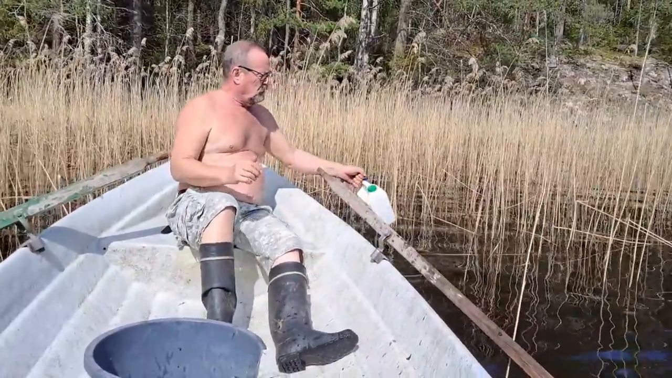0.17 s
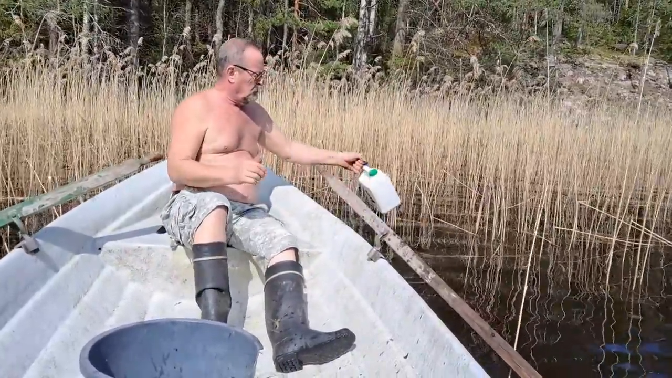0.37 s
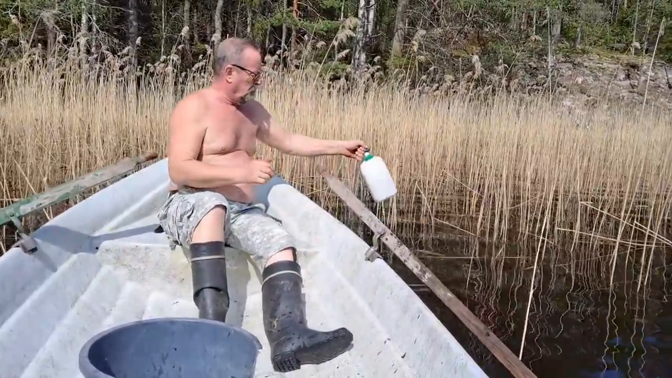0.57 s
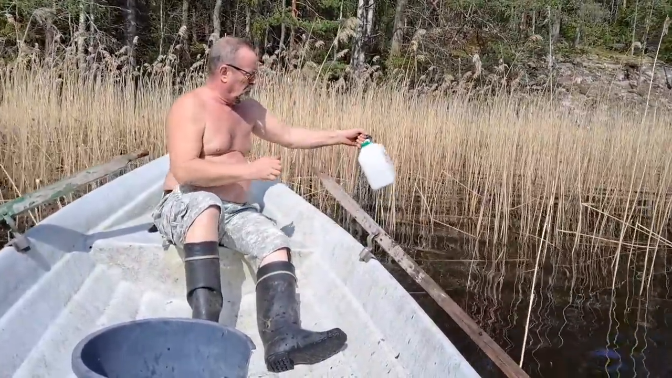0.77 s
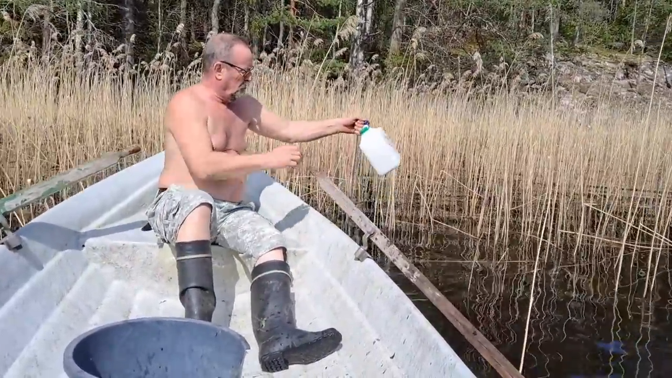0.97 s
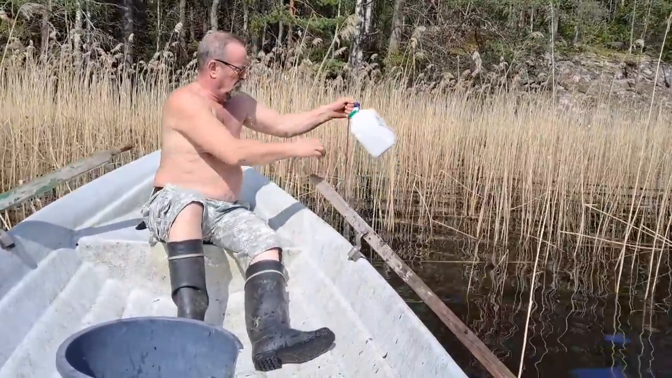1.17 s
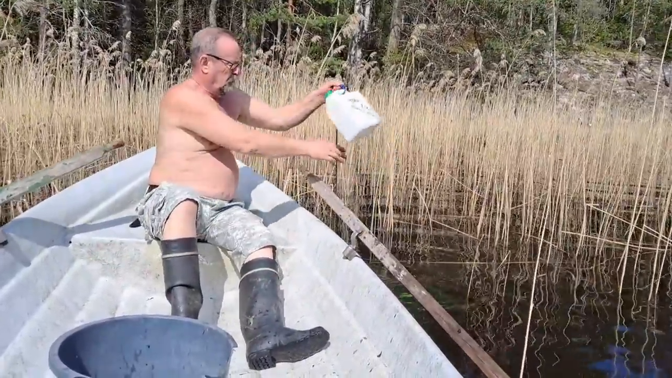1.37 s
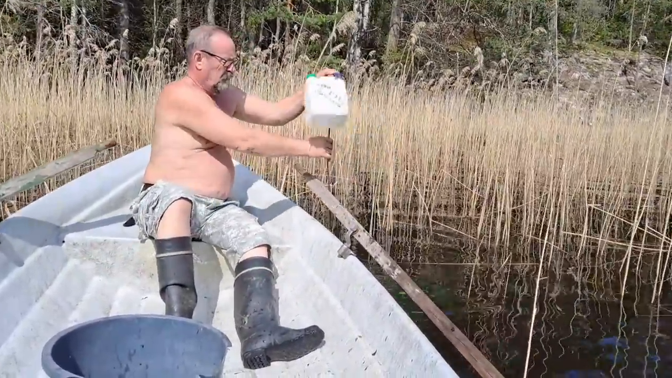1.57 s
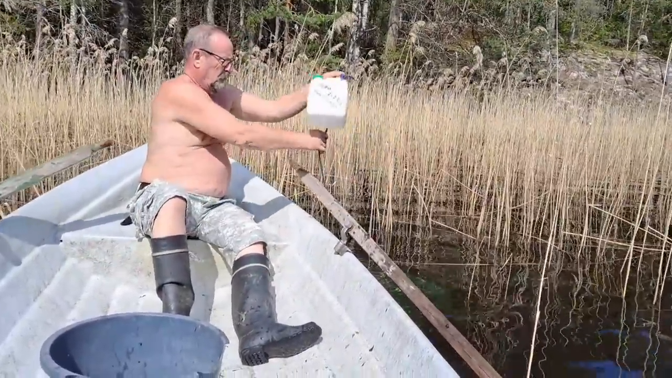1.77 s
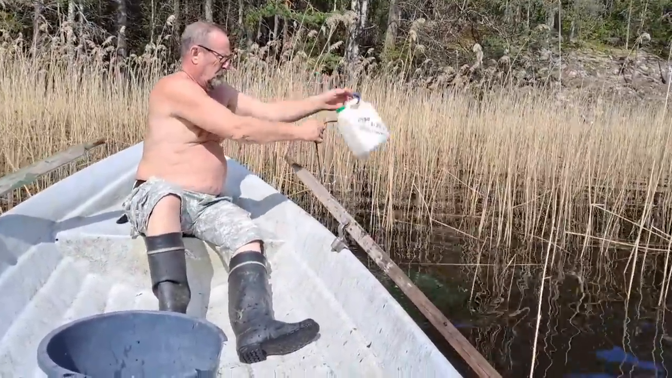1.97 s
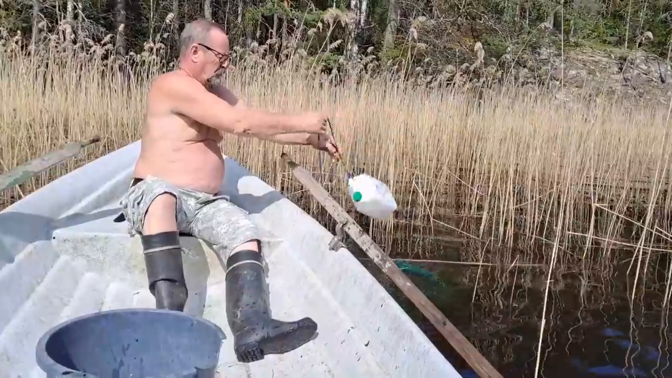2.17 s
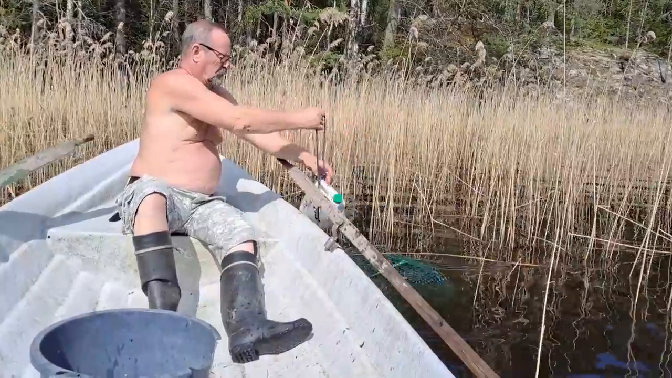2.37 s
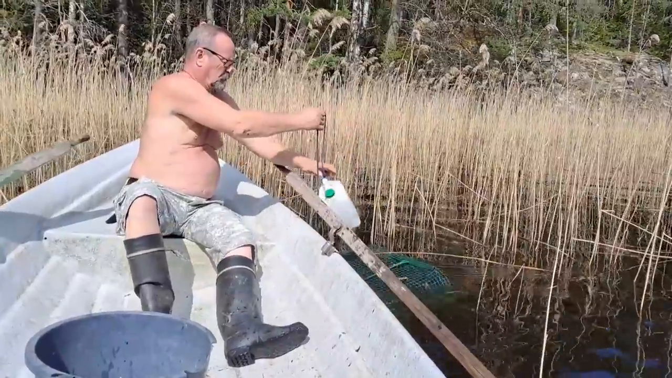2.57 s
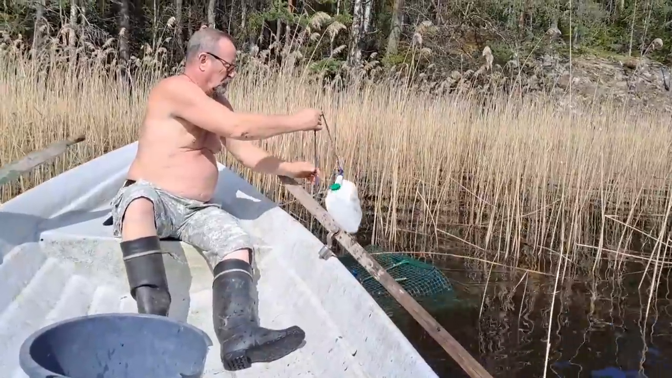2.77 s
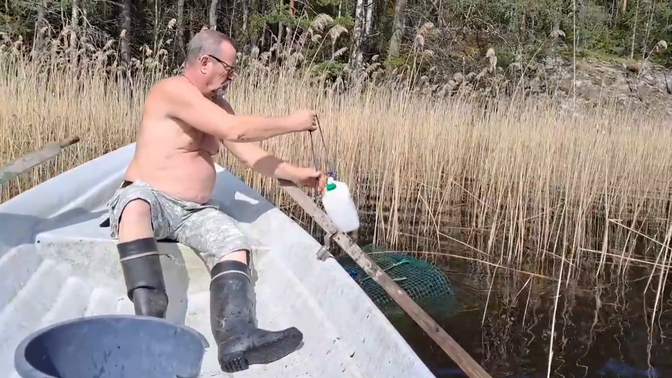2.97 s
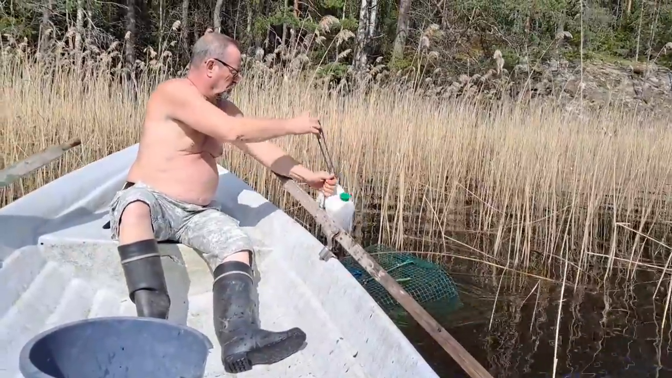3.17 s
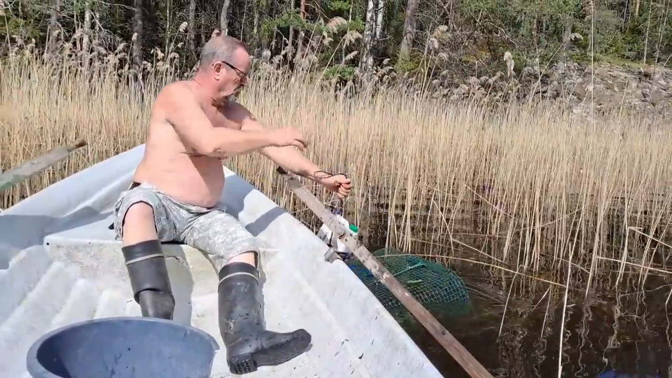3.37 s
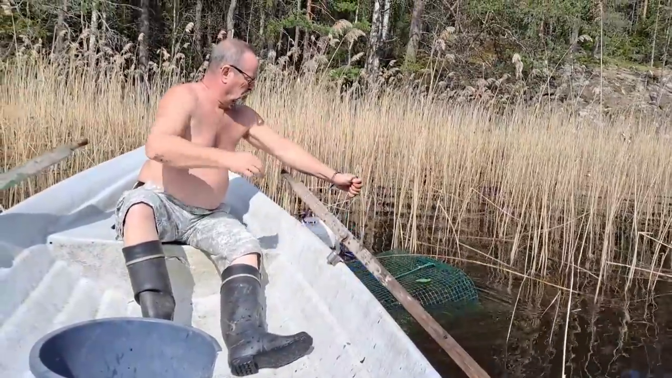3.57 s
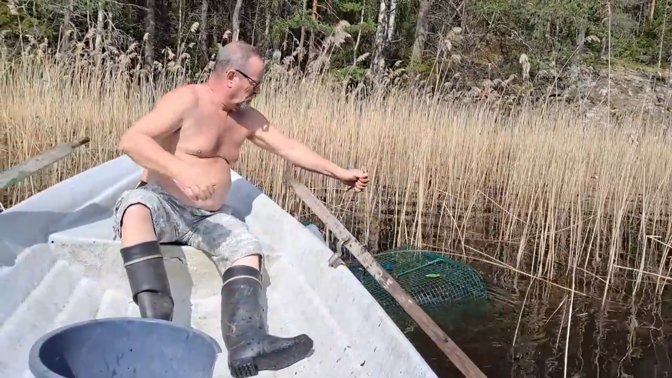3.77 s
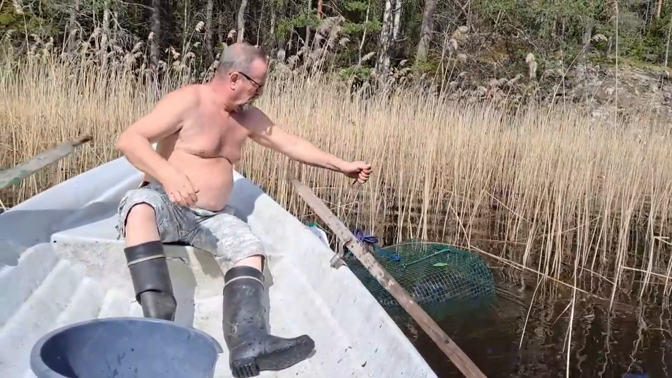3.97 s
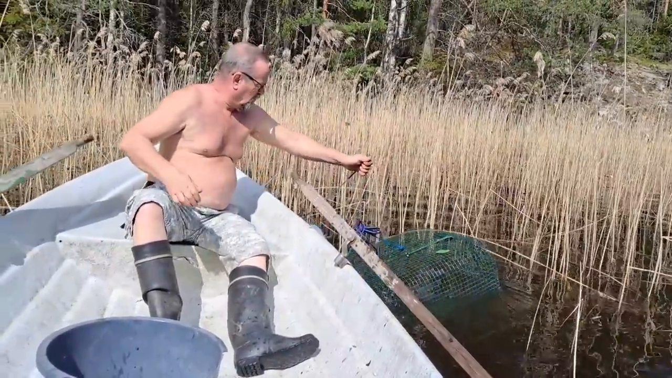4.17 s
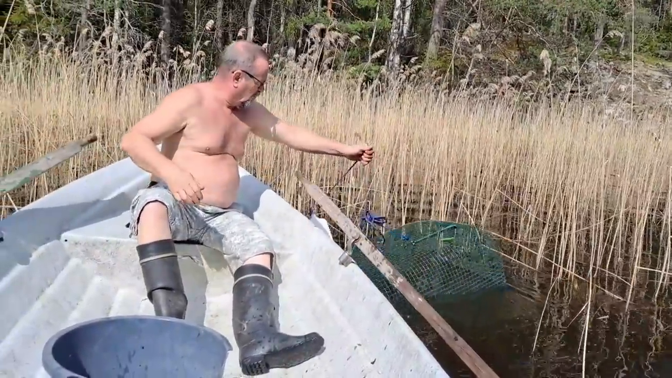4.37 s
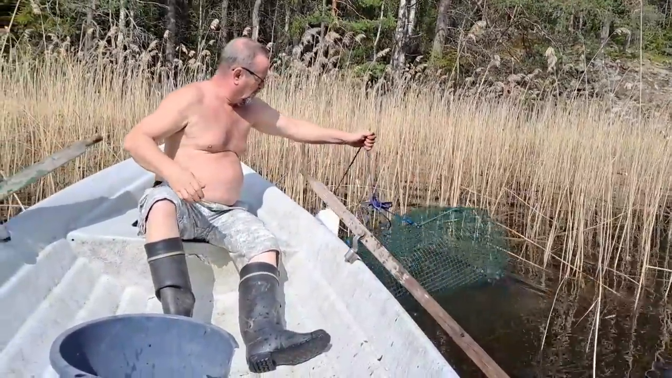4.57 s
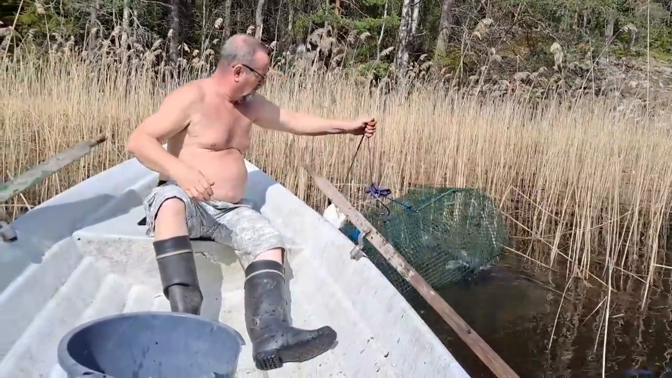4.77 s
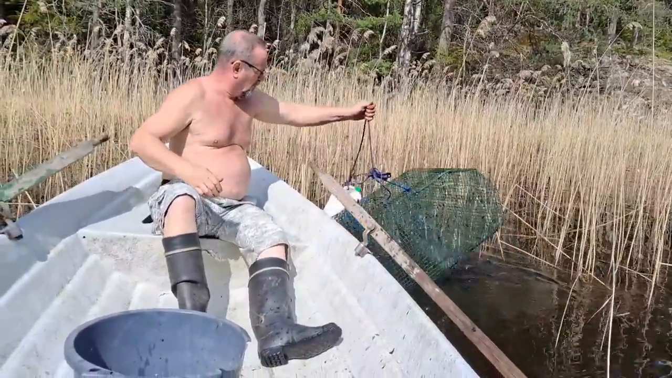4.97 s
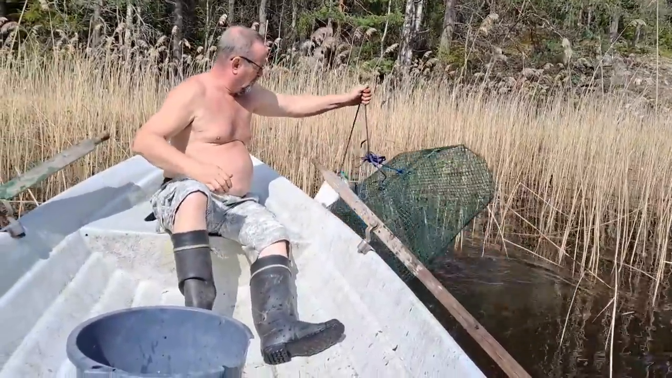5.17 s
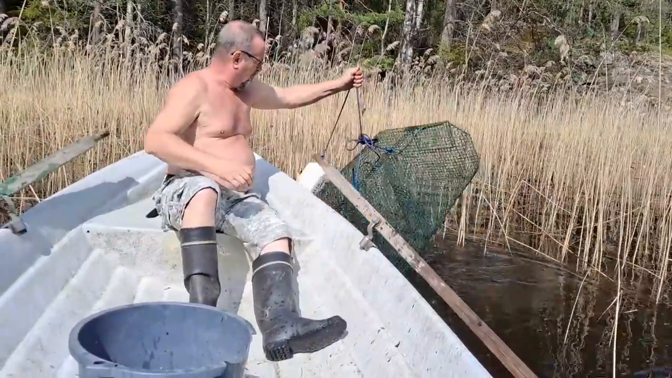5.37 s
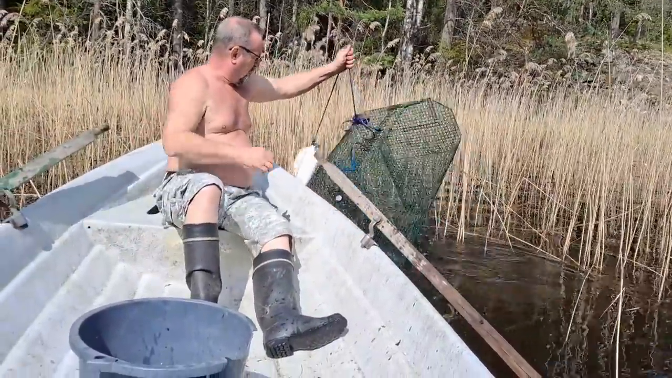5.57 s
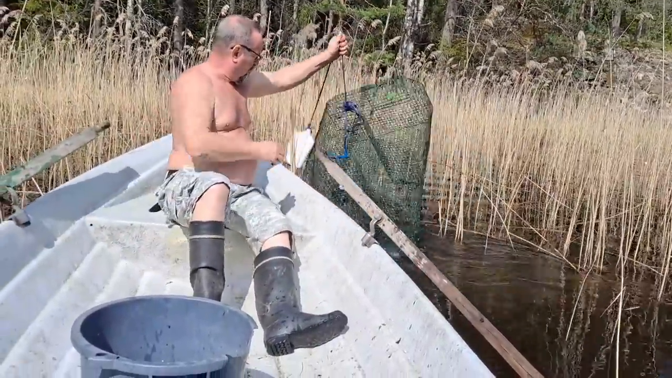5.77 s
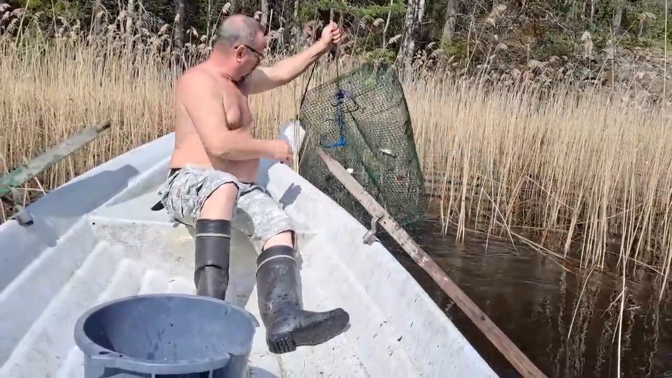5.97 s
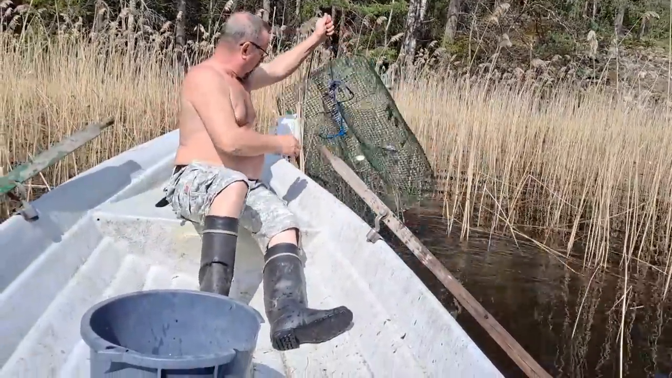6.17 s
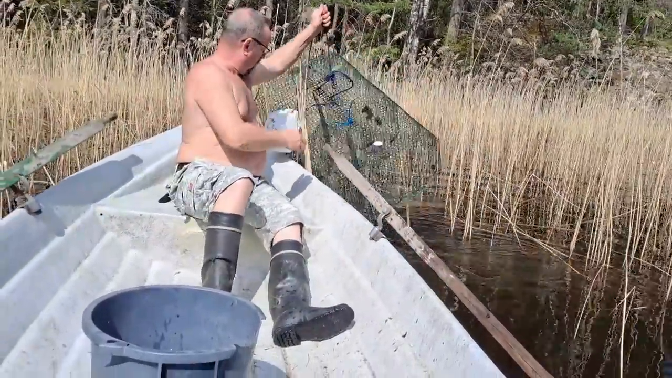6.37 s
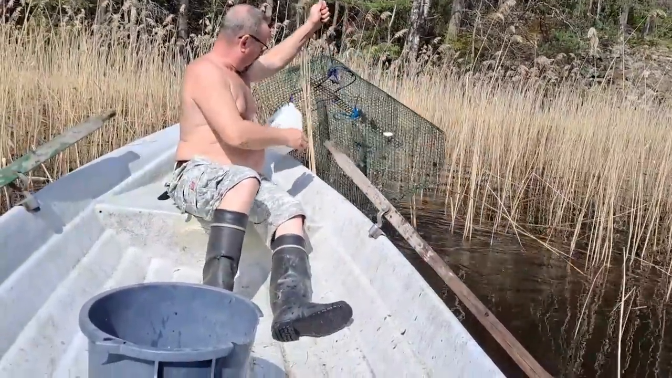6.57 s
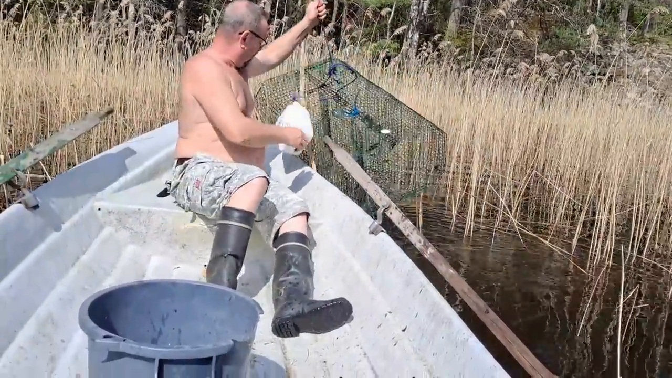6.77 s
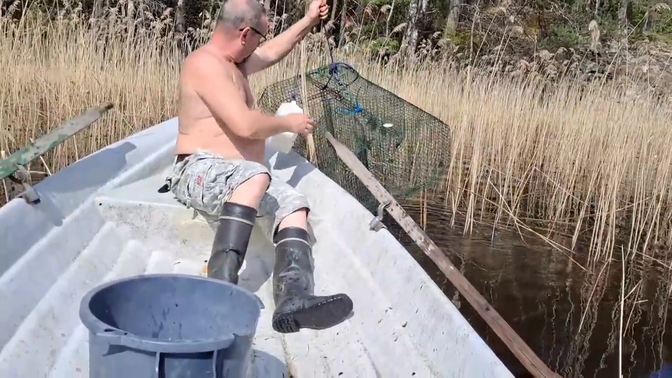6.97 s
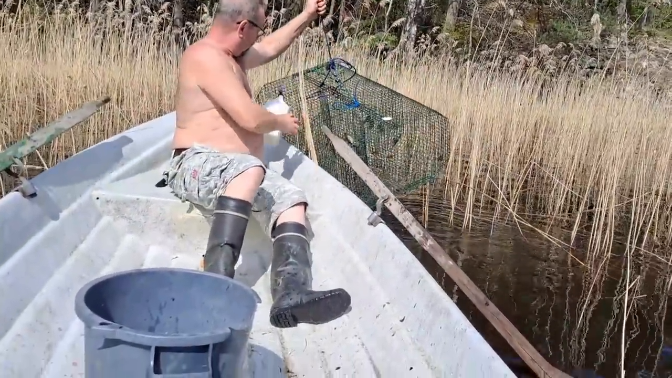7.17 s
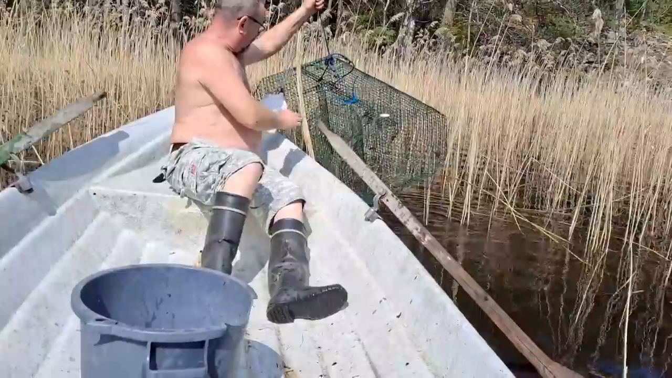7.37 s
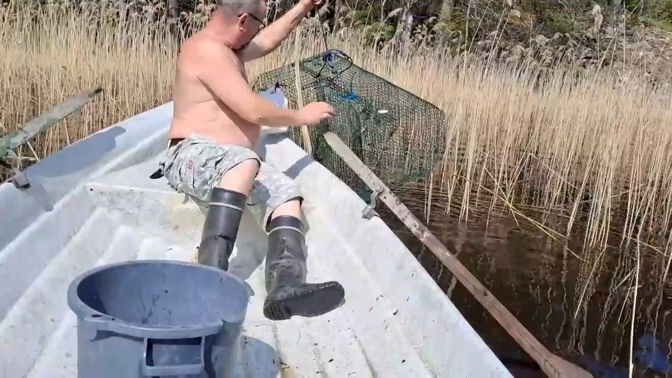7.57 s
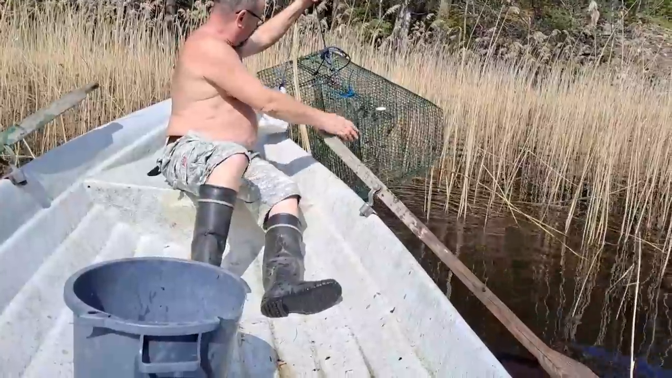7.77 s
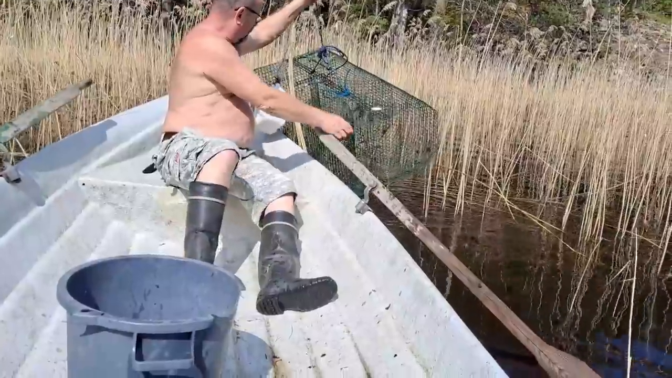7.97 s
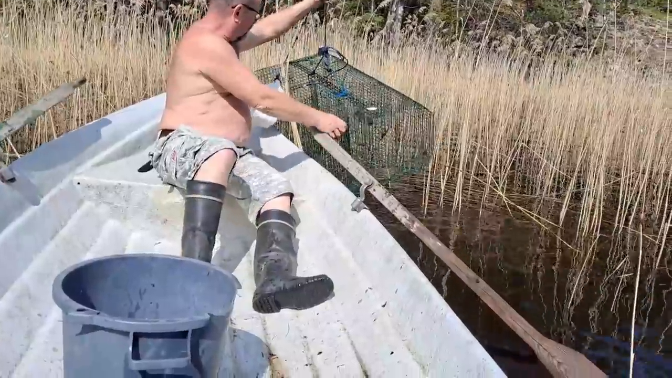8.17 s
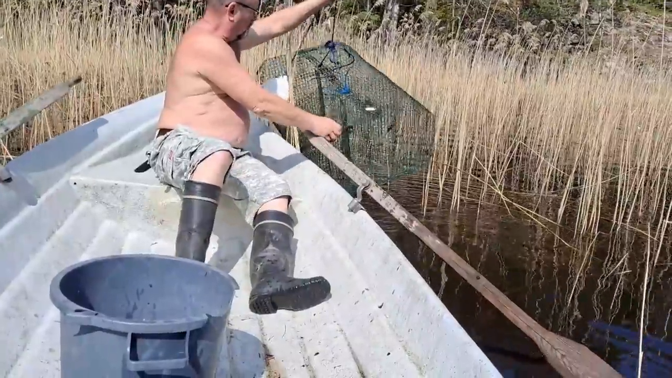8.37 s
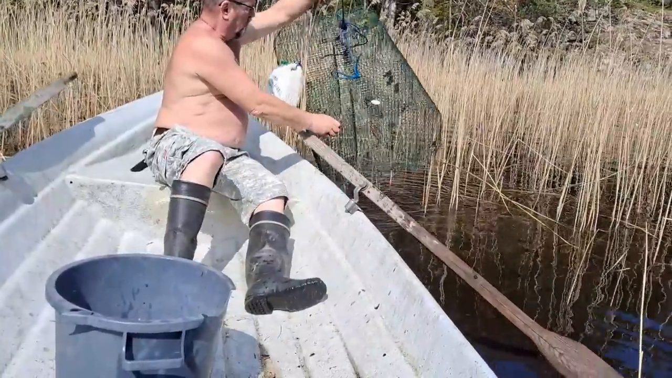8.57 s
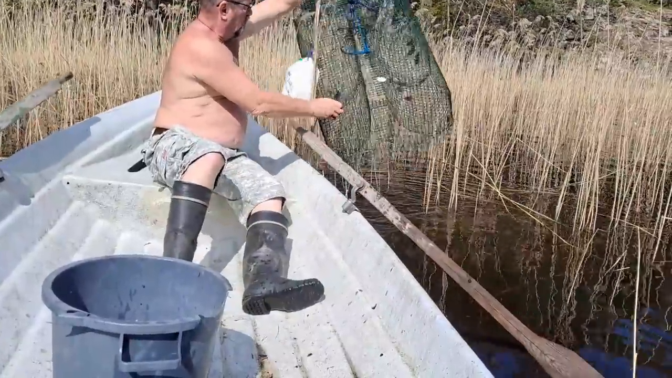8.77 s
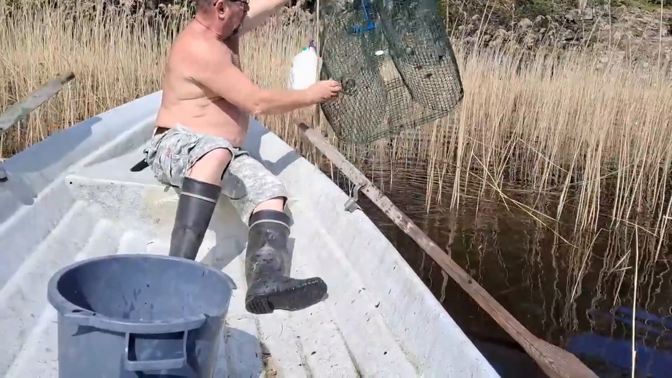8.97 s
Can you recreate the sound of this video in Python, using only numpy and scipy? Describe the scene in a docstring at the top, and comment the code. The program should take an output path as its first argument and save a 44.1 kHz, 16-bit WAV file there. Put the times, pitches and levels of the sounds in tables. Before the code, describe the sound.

A plastic float knocks sharply against a rowboat's thin hull, then rope and a wire fish trap rub along the side with a hollow groan. Water plops and trickles off the rising mesh amid a busier run of knocks, scrapes and wire ticks. The handling eases, and the wire gives one short squeak. A small bird sings faintly among distant trees, while the boat sounds are close in a quiet outdoor stereo space.

```python
"""Hauling a fish trap into a rowboat

A wire trap comes out of a reedy lake. Its plastic float and frame knock and drag on the thin hull,
exciting the wall's modes by impact and by stick-slip friction. The mesh ticks and squeaks on the oar,
and water runs off in noise and ringing bubbles. A small bird sings far away among echoing trees.
Two microphone ports a little apart hear it all, with a faint rumble of air."""
import sys
import numpy as np
from scipy import signal
from scipy.fft import rfft, irfft, next_fast_len
from scipy.io import wavfile
from scipy.ndimage import uniform_filter1d, map_coordinates

SR = 44100
rng = np.random.default_rng(int(sys.argv[2]) if len(sys.argv) > 2 else 0)


def unload_audio(sound):
    """Save the sound as a 16-bit wav file, at the path given as the first command line argument."""
    columns = np.transpose(np.atleast_2d(sound))
    # keep every value between -1 and 1, then stretch to whole-number steps
    steps = np.round(np.clip(columns, -1, 1) * 32767)
    wavfile.write(sys.argv[1], SR, steps.astype(np.int16))


N = 398223


def amp(db):
    """Amplitude ratio of a level in decibels."""
    return 10 ** (np.asarray(db) / 20)


def unit(x):
    """Normalisation to an rms of 1."""
    return x / np.sqrt(np.mean(x ** 2) + 1e-20)


def along(points, hz):
    """Interpolation of (frequency, value) points on a logarithmic frequency axis."""
    point_hz, values = np.transpose(points)
    return np.interp(np.log(hz + 1), np.log(point_hz + 1), values)


def curves(rows):
    """Linear interpolation in time: one curve for each column after the first."""
    times, *columns = np.transpose(rows)
    return [np.interp(np.arange(N) / SR, times, column) for column in columns]


def wobble(rate_hz):
    """Random modulation: a smooth curve of rms 1 through rate_hz random values a second."""
    knots = rng.standard_normal(int(N * rate_hz / SR) + 4)
    return unit(map_coordinates(knots, [np.arange(N) * rate_hz / SR]))


def filtered(x, response):
    """Linear filtering: the spectrum is multiplied by a complex frequency response."""
    size = next_fast_len(N + SR // 2)
    return irfft(rfft(x, size) * response(np.fft.rfftfreq(size, 1 / SR)), size)[..., :N]


def colour(spectrum):
    """Magnitude response through (frequency_hz, level_db) points."""
    return lambda hz: amp(along(spectrum, hz))


def add(track, start_s, sound, pan_db):
    """Superposition of a sound on the track, pan_db stronger on the left than on the right."""
    spot = track[:, round(start_s * SR):round(start_s * SR) + sound.shape[-1]]
    spot += amp([[pan_db / 2], [-pan_db / 2]]) * sound[..., :spot.shape[1]]


def burst(spectrum, t, t60_s, apart):
    """Exponential decay of coloured noise; apart weights the part that differs between the ports."""
    raw = rng.standard_normal((3, len(t)))
    response = amp(along(spectrum, np.fft.rfftfreq(len(t), 1 / SR)))
    noise = unit(irfft(rfft(raw[0] + apart * raw[1:]) * response, len(t)))
    return noise * amp(-60 * t / t60_s) * (1 - np.exp(-t / 0.00072)) / 2


# Likeness of the sound at the two ports: frequency_hz, correlation
COHERENCE = [(60, 0.77), (180, 0.89), (550, 0.79), (1650, 0.068), (4970, 0.049), (15000, 0.01)]
def field_noise(response, grit_db, grit_hz):
    """Partial coherence: gritty noise of rms 1, alike at both ports in the bass, unlike in the treble."""
    def mid_and_side(hz):
        angle = np.arccos(np.clip(along(COHERENCE, hz), -1, 1)) / 2
        return response(hz) * [np.cos(angle), np.sin(angle)]
    pair = rng.standard_normal((2, N)) * amp(grit_db * wobble(grit_hz))
    mid, side = filtered(pair, mid_and_side)
    return unit(np.array([mid + side, mid - side]))


def breeze():
    """Pressure fluctuations of air moving over the ports make a faint low rumble."""
    rumble = colour([(20, -3.5), (70, -2.5), (150, -28), (400, -74)])
    return amp(-71 + 1.8 * wobble(2.1)) * field_noise(rumble, grit_db=3.5, grit_hz=22)


# Notes of the distant bird: start_s, length_s, start_hz, end_hz, level_db
BIRD_NOTES = [(0.844, 0.016, 4600, 4040, -79), (0.926, 0.031, 4250, 2980, -72),
              (.98, 0.02, 4000, 3240, -74), (1.073, 0.018, 4500, 3900, -70),
              (1.146, 0.033, 4200, 2950, -63), (1.303, .026, 4500, 3070, -63),
              (1.362, 0.012, 3000, 3820, -59.5), (1.385, 0.042, 3800, 2510, -61.5),
              (1.528, 0.026, 4450, 3050, -62.5), (1.606, 0.019, 3000, 3400, -56),
              (1.614, 0.03, 3400, 2500, -62), (1.684, 0.037, 2450, 2550, -80),
              (2.123, 0.091, 2300, 3330, -70), (2.362, 0.048, 2530, 4340, -60),
              (2.433, 0.047, 3890, 2920, -63), (2.621, 0.041, 2600, 3030, -59),
              (2.674, .06, 3900, 4830, -67.5), (2.835, 0.034, 4400, 3500, -72),
              (2.866, .045, 3500, 3420, -66), (2.93, 0.067, 3750, 3450, -67), (3.783, .03, 5300, 5000, -64),
              (3.88, 0.034, 6000, 4250, -65), (3.968, 0.043, 6300, 4260, -64.5),
              (4.064, .028, 6400, 4100, -66), (4.14, 0.033, 3250, 4220, -64.5),
              (4.243, 0.026, 3500, 4250, -64), (4.354, 0.036, 3400, 4300, -64),
              (4.399, 0.02, 3400, 2860, -66), (4.42, 0.027, 2870, 3300, -71), (4.46, .03, 3200, 4050, -65),
              (4.573, 0.028, 3500, 4160, -59), (4.69, .018, 3580, 4160, -65),
              (5.005, 0.093, 3350, 2380, -59.5)]
def bird(direct_gain=0.9, echo_t60_s=0.7):
    """Reverberation: thin swept whistles arrive directly and as a blurred echo from the trees."""
    song, warble = np.zeros((2, N)), 0.016 * wobble(120)
    for start_s, length_s, start_hz, end_hz, level_db in BIRD_NOTES:
        progress = np.arange(int(length_s * SR)) / (length_s * SR)
        hz = start_hz * (end_hz / start_hz) ** progress
        hz *= 1 + warble[round(start_s * SR):][:len(hz)]
        envelope = amp(level_db) * np.sin(np.pi * progress) ** 0.4
        add(song, start_s, envelope * np.sin(2 * np.pi * np.cumsum(hz) / SR), pan_db=0)
    song *= amp(2.5 * wobble(250))  # the whistle flutters on its way
    t = np.arange(SR) / SR
    tail = rng.standard_normal((2, len(t))) * amp(-60 * t / echo_t60_s)
    scattered = song * (0.72 + 0.596 * wobble(700))
    echo = signal.fftconvolve(scattered, tail / np.linalg.norm(tail[0]), axes=1)[:, :N]
    return direct_gain * song + echo


def patchy(x, depth_db=2.4):
    """Spectral modulation: random patches of gain shift over time and frequency."""
    spectra = signal.stft(x, nperseg=512)[2]
    patches = uniform_filter1d(rng.standard_normal(spectra.shape[1:]), size=9, axis=0)
    patches = uniform_filter1d(patches, size=5, axis=1)
    return unit(signal.istft(spectra * amp(depth_db * unit(patches)), nperseg=512)[1][:, :N])


def bubbles(flow_db, low_hz, pitch_ratio, decay_cycles, glide, max_count, samples):
    """Bubble resonance: damped, rising tones of scattered pitch, louder and denser with the flow."""
    when, pitch, strength, bearing = rng.random((max_count, 4)).T[:, :, None]
    t = np.arange(samples) / SR
    start = (when * (N - samples)).astype(int)
    hz = low_hz * pitch_ratio ** pitch
    gain = amp(flow_db[start] - 4.5 * np.log(strength + 0.01))
    gain *= rng.random((max_count, 1)) < np.interp(flow_db[start], [-64, -54], [0, 1])
    plinks = gain * np.exp(-t * hz / decay_cycles) * np.sin(2 * np.pi * hz * t * (1 + glide * t))
    lag = np.round(6 * (bearing - 0.5)).astype(int)  # bearing sets the delay between the ports
    arrivals = [np.clip(start + np.arange(samples) + side * lag, 0, N - 1) for side in (1, -1)]
    return np.array([np.bincount(index.ravel(), plinks.ravel(), N) for index in arrivals])


# Water running off rope and mesh: time_s, spray_db, trickle_db
RUNOFF = [(0.0, -68.5, -67.5), (0.3, -69.5, -73), (0.68, -61, -67), (0.95, -70, -74), (1.41, -66.5, -65.5),
          (2.01, -70, -68.5), (2.46, -68.5, -60), (2.74, -74, -76), (3.3, -70.5, -73.5),
          (3.87, -65.5, -66.5), (4.15, -71.5, -76.5), (4.55, -67, -60), (5.15, -58, -58.5),
          (5.61, -57, -54), (5.76, -59.5, -61.5), (6.31, -60.5, -65.5), (6.39, -58, -61),
          (6.51, -62.5, -68), (7.01, -66, -69.5), (7.17, -78, -107), (7.44, -77, -79), (7.67, -71.5, -76),
          (8.07, -72.5, -81), (8.35, -68.5, -80.5), (8.52, -65, -65), (9.03, -61.5, -63)]
# Spectra of the trickle and of the finer spray: frequency_hz, level_db
TRICKLE_SPECTRUM = [(1060, -7), (1800, -4), (2090, -10), (2260, -8.5), (2680, -6), (3870, -7), (6000, -19),
                    (7800, -50), (13200, -120)]
SPRAY_SPECTRUM = [(2700, -63), (4500, -2.5), (7000, -1.5), (9600, 0.5), (11000, -4.5), (13500, -1.5),
                  (15000, -0.5), (17000, -20.5)]
def runoff():
    """Unsteady flow: trickle and spray noise surge a little together under drops and larger bubbles."""
    spray_db, trickle_db = curves(RUNOFF)
    surge_db = 1.5 * wobble(24)
    trickle = patchy(field_noise(colour(TRICKLE_SPECTRUM), grit_db=1, grit_hz=290))
    spray = patchy(field_noise(colour(SPRAY_SPECTRUM), grit_db=1, grit_hz=140))
    drops = bubbles(spray_db, low_hz=2500, pitch_ratio=5.5, decay_cycles=3.6, glide=15,
                    max_count=2400, samples=256)
    gurgle = bubbles(trickle_db - 1, low_hz=607, pitch_ratio=3.3, decay_cycles=5.4, glide=9.5,
                     max_count=500, samples=1024)
    trickle *= amp(trickle_db + surge_db + 3.1 * wobble(23))
    spray *= amp(spray_db + surge_db + 2.8 * wobble(9.9))
    return trickle + spray + drops + gurgle


# Flicks of spray off the rope: centre_s, length_s, level_db
FLICKS = [(0.314, 0.19, -63), (1.818, 0.13, -65), (5.198, 0.054, -60.5), (6.059, 0.1, -60),
          (5.578, .08, -67), (6.479, 0.14, -49.5), (7.147, 0.077, -62), (8.959, 0.058, -54.5),
          (9.02, 0.096, -53)]
def spray_flicks():
    """Amplitude modulation: each flick of spray is a Gaussian swell of fine hiss."""
    t = np.arange(N) / SR
    swells = sum(amp(level_db) * np.exp(-((t - centre_s) / length_s * 2) ** 2)
                 for centre_s, length_s, level_db in FLICKS)
    hiss = colour([(2000, -3.5), (5000, -5), (7500, -4), (16000, -10)])
    return swells * field_noise(hiss, grit_db=1.5, grit_hz=190)


# Bubbles bursting as the trap drains: start_s, pitch_hz, level_db
PLOPS = [(4.628, 1730, -47), (4.638, 1004, -44), (4.66, 2770, -53), (4.831, 1500, -55), (4.835, 1110, -53),
         (4.852, 2010, -52), (4.92, 2720, -49), (5.105, 2400, -53)]
def plops(decay_cycles=6, pitch_rise=0.05, ragged_db=4):
    """Damped oscillation: each bubble starts softly, rises in pitch and dies away unevenly."""
    track, t = np.zeros((2, N)), np.arange(SR // 20) / SR
    for start_s, pitch_hz, level_db in PLOPS:
        age = t * pitch_hz / decay_cycles
        envelope = amp(level_db) * np.exp(-age) * (1 - np.exp(-6 * age))
        tone = np.sin(2 * np.pi * pitch_hz * t * (1 + pitch_rise * age / 2))
        add(track, start_s, envelope * tone, pan_db=1)
    return track * amp(ragged_db * wobble(500))


# Sharpest edge of a hard contact, in ticks and knocks alike: frequency_hz, level_db
CRACK_SPECTRUM = [(3000, -36.5), (6000, 1), (10000, 5), (13000, -0.5), (17000, 3)]
# Ticks of wire and drops: start_s, level_db, pitch_hz, pan_db
TICKS = [(1.487, -46, 5070, 8), (2.2034, -49.5, 3590, 8), (3.045, -53.5, 5000, -1),
         (3.4186, -51, 2960, 0.5), (3.513, -55.5, 5180, 17.5), (3.6047, -44, 8700, 10),
         (3.695, -52.5, 3320, -3), (3.794, -44, 7950, 1.5), (3.8143, -44, 3730, 8), (3.844, -43, 2640, 0.5),
         (3.8982, -56.5, 4430, 10), (3.99, -60.5, 4410, 8), (4.285, -49.5, 9920, -1.5),
         (4.3336, -45, 2510, 0), (4.737, -53, 5500, -3.5), (4.796, -32.5, 10600, -1.5),
         (4.836, -46.5, 4500, 2), (5.0, -46, 4500, -3.5), (5.098, -44.5, 6500, -3),
         (5.299, -48, 11000, -0.5), (5.394, -43, 8500, -1), (5.1, -50, 2470, -1),
         (5.147, -35.5, 2480, -0.5), (5.188, -51, 9750, 3), (5.54, -34, 3230, 2), (6.0388, -34, 3760, -1.5),
         (6.0643, -26, 2470, -2), (6.0671, -24, 12400, 1), (6.076, -46, 12000, -4),
         (6.029, -33.5, 11400, -5), (6.098, -41, 10000, 1), (5.742, -44, 5500, -8.5),
         (5.785, -46.5, 9000, -3.5), (6.162, -41.5, 9000, 0), (6.203, -50.5, 13000, 0.5),
         (6.46, -42.5, 9800, -2.5), (6.2168, -50, 2300, -6.5), (6.342, -38, 3840, -3.5),
         (6.3928, -37.5, 9700, 1.0), (6.4278, -43.5, 2050, -3), (6.4766, -47.5, 2043, -15),
         (6.5188, -42.5, 2820, 8), (6.984, -46, 10000, 1), (7.36, -56, 9240, 4), (7.5291, -41.5, 5000, 3),
         (7.8118, -50, 2100, 2), (8.157, -50.5, 8740, 2.0), (8.1883, -59, 7050, 4), (7.765, -55.5, 4000, 6),
         (8.229, -57.5, 7200, -1), (8.256, -63, 2500, -3), (8.321, -52, 2460, 8), (1.789, -56, 12000, -3),
         (1.809, -50, 11040, -1.5), (8.938, -42, 6000, 7)]
def ticks(t60_s=0.035):
    """Impulsive excitation: a small impact gives a blurred ring, a treble snap and a brief click."""
    track, t = np.zeros((2, N)), np.arange(SR // 20) / SR
    for start_s, level_db, pitch_hz, pan_db in TICKS:
        resonance = [(pitch_hz / 1.6, -22), (pitch_hz, 0), (pitch_hz * 1.3, -16), (pitch_hz * 3, -24)]
        ring = burst(resonance, t, t60_s * (3000 / pitch_hz) ** 0.4, apart=1)
        snap = amp(-5) * burst(CRACK_SPECTRUM, t, 1.4 * t60_s, apart=0.42)
        click = amp(-5.5) * burst(CRACK_SPECTRUM, t, t60_s=0.005, apart=0.4)
        add(track, start_s, amp(level_db) * (ring + snap + click), pan_db)
    return track


# Course of the wire's squeak: time_s, pitch_hz, level_db, overtone_db (relative to the fundamental)
SQUEAK = [(8.38, 2240, -58, -10), (8.391, 2220, -45, -14), (8.398, 2040, -53, -4), (8.42, 2010, -48, 4),
          (8.444, 1900, -48, 0), (8.45, 1760, -52, 5), (8.466, 1720, -49, 4), (8.469, 1860, -49, -2),
          (8.481, 1900, -46, -3), (8.485, 1700, -58, 0), (8.488, 1520, -51, 5), (8.499, 1480, -52, 4),
          (8.506, 1460, -60, 4), (8.514, 1450, -66, 4)]
def squeak():
    """Stick-slip oscillation: wet wire slips unevenly over the oar in a hoarse, falling tone with hiss."""
    pitch_hz, level_db, overtone_db = curves(SQUEAK)
    start_s, end_s = SQUEAK[0][0], SQUEAK[-1][0]
    gate = np.interp(np.arange(N) / SR, [start_s - 0.01, start_s, end_s, end_s + 0.01], [0, 1, 1, 0])
    cycles = np.cumsum(pitch_hz * (1 + 0.012 * wobble(150) + 0.042 * wobble(900))) / SR
    partials_db = [0, overtone_db, overtone_db - 6, overtone_db - 12]
    tone = sum(amp(db + 4.3 * wobble(220)) * np.sin(2 * np.pi * harmonic * cycles)
               for harmonic, db in enumerate(partials_db, 1))
    hiss_colour = colour([(1500, -20), (3400, -5.5), (4600, -6), (7000, -15.5), (16000, -24)])
    hiss = field_noise(hiss_colour, grit_db=1.2, grit_hz=180)
    hiss_db = uniform_filter1d(level_db, size=1800) - 4  # follows the pressure, not each slip
    stutter = amp(1.7 * wobble(260))
    return gate * stutter * (amp(level_db) * tone + amp(hiss_db) * hiss) * amp([[1.2], [-1.2]])


def stroke(start_s, length_s, first_db, last_db, attack_s=0.019, release_s=0.013):
    """Envelope of a rub under steadily changing pressure: its span of samples and its gain."""
    span = slice(round(start_s * SR), min(round((start_s + length_s + release_s) * SR), N))
    t = np.arange(span.stop - span.start) / SR
    edges = np.clip(np.minimum(t / attack_s, (length_s - t) / release_s + 1), 0, 1)
    return span, amp(np.interp(t, [0, length_s], [first_db, last_db])) * edges


# Rubs on mesh or hull: start_s, length_s, pitch_hz, bandwidth_hz, first_db, last_db
RASPS = [(0.171, 0.2, 796, 35.1, -58.5, -71), (0.174, 0.41, 660, 35.1, -68, -62.5),
         (0.915, 0.38, 790, 80, -65, -78), (2.94, 0.056, 2100, 150, -64, -75),
         (6.096, 0.13, 2330, 294, -53.5, -56), (7.114, .025, 3160, 900, -59, -58.5),
         (7.526, 0.053, 1980, 200, -57, -70.5), (8.326, 0.057, 2400, 507, -65, -60),
         (8.935, .03, 2610, 248, -50.5, -50.5), (8.941, .018, 7020, 3000, -43, -42.5)]
def rasps():
    """Resonant filtering: gritty friction noise sounds a single resonance of mesh or hull."""
    track, grit = np.zeros((2, N)), amp(2 * wobble(120))
    for start_s, length_s, pitch_hz, bandwidth_hz, first_db, last_db in RASPS:
        span, gain = stroke(start_s, length_s, first_db, last_db)
        raw = rng.standard_normal((3, len(gain))) * grit[span]
        friction = raw[0] + 0.65 * raw[1:]  # a little different at each port
        resonator = signal.iirpeak(pitch_hz, pitch_hz / bandwidth_hz, SR)
        track[:, span] += gain * unit(signal.lfilter(*resonator, friction))
    return track


# Modes of the thin hull, dragged on or struck: pitch_hz, level_db, t60_s
HULL_MODES = [(51.4, -12, 0.46), (76.3, -1.5, 0.46), (103, -5, 0.34), (132.9, -1, 0.35), (161, -2.5, 0.34),
              (201, -4, 0.26), (234.95, -3, 0.38), (271.3, -7, 0.22), (306, -14.5, 0.2), (341, -2.5, 0.08),
              (419.6, 1.5, 0.16), (469.4, 0.5, 0.15), (526, -1.5, 0.1), (601, 3.5, 0.12),
              (648, -0.5, 0.093), (704, 2, 0.13), (800, -6, 0.056), (883, -7.5, 0.091), (976, -5.5, 0.074),
              (1145, -7, 0.058), (1309, -11, 0.086), (1443, -15.5, 0.056), (1599, -13, 0.061),
              (1853, -15.5, .07), (2100, -17, 0.044), (2387, -22, 0.07), (2970, -26.5, 0.025),
              (3750, -23, 0.043)]
def hull_response(low_hz, high_hz, widening):
    """Modal superposition: the response of the hull's modes in one band, each widened by the load."""
    modes = [(hz, db, widening / t60_s) for hz, db, t60_s in HULL_MODES if low_hz < hz < high_hz]
    cutoff_hz = 0.13 * modes[0][0]
    def response(f):
        resonances = sum((-1) ** k * amp(db) * 1j * f * width_hz / (hz * hz - f * f + 1j * f * width_hz)
                         for k, (hz, db, width_hz) in enumerate(modes))
        return resonances * f * f / (f * f + cutoff_hz ** 2)
    return response


# The hull's four bands (groan, rasp, hollow rub, scratch): edge_hz; centre_hz
BAND_EDGES_HZ = [0, 340, 560, 850, 4000]
BAND_CENTRES_HZ = [200, 450, 690, 1250]
# Murmur of the hull between strokes: time_s, groan_db, upper_db
MURMUR = [(0, -81, -76), (.7, -81.5, -74.5), (1.4, -78.5, -70.5), (2.2, -72.5, -74), (2.6, -54, -62.5),
          (2.8, -66, -77), (3.4, -77, -78.5), (4.15, -71, -80.5), (4.8, -63, -71), (5.2, -64.5, -64),
          (5.4, -51, -63), (5.445, -58.5, -69.5), (5.5, -49, -58), (5.9, -43, -51.5), (6.25, -52.5, -63),
          (6.6, -52.5, -69), (6.72, -70.5, -67.5), (7.1, -57, -65.5), (7.35, -60, -85), (8, -73.5, -75),
          (8.4, -68.5, -75), (9.03, -72.5, -63)]
# Murmur in each of the three upper bands: offset_db
MURMUR_OFFSETS_DB = [-6, -2, -5]
# Float, rope and frame dragging on the hull: start_s, length_s, first_db, last_db, favoured_hz
DRAG_STROKES = [(0.157, 0.54, -67.5, -67, 840), (0.905, 0.4, -76, -64.5, 870),
                (1.507, 0.24, -54.5, -78, 202), (1.65, 0.29, -97, -71, 694),
                (2.343, 0.12, -50.5, -42.5, 533), (2.426, 0.3, -43, -53.5, 176.3),
                (2.927, 0.21, -42.5, -69.5, 174), (3.265, 0.45, -72, -68, 447),
                (3.42, 0.24, -53, -60.5, 287), (3.703, 0.16, -51, -54.5, 292),
                (3.869, 0.21, -46, -58.5, 302), (4.199, 0.17, -60.5, -61.5, 353),
                (4.452, 0.21, -69.5, -58.5, 550), (4.602, 0.27, -49, -67, 291),
                (4.897, 0.27, -43, -68, 423), (5.225, 0.2, -45, -47, 504), (5.467, 0.3, -39, -41.5, 490),
                (5.687, 0.18, -47, -52, 391), (5.9, 0.18, -37, -41.5, 309),
                (6.035, 0.165, -29.5, -64.5, 178), (6.266, 0.17, -39, -61.5, 535),
                (6.413, 0.15, -46, -45, 297), (6.787, 0.21, -57, -55, 310), (7.024, 0.394, -61, -63.5, 174),
                (7.46, 0.16, -61.5, -69, 200), (7.596, 0.16, -54, -63.5, 254),
                (7.754, 0.12, -53.5, -59, 176), (8.103, 0.148, -68, -65.5, 181),
                (8.24, 0.32, -68.5, -58.5, 384), (8.477, 0.436, -62, -60, 880)]
def hull_drag(below_db_per_octave=11, above_db_per_octave=8):
    """Forced vibration: stick-slip grit drives the hull's modes, and harder rubbing stutters more."""
    groan_db, upper_db = curves(MURMUR)
    power = amp([groan_db] + [upper_db + db for db in MURMUR_OFFSETS_DB]) ** 2
    for start_s, length_s, first_db, last_db, favoured_hz in DRAG_STROKES:
        octaves = np.log2(np.array(BAND_CENTRES_HZ) / favoured_hz)[:, None]
        coupling = amp(np.minimum(below_db_per_octave * octaves, -above_db_per_octave * octaves))
        span, gain = stroke(start_s, length_s, first_db, last_db)
        power[:, span] += (coupling * gain) ** 2
    levels_db = 10 * np.log10(power)
    stutter_db = np.clip((levels_db[1] + 93) / 8, 0.3, 1.3) * wobble(45)
    widenings = [4.4, 4.1, 2.4, 7.1]
    responses = map(hull_response, BAND_EDGES_HZ, BAND_EDGES_HZ[1:], widenings)
    return sum(amp(level_db + 3 + stutter_db) * field_noise(response, grit_db=-1.14, grit_hz=160)
               for level_db, response in zip(levels_db, responses))


def struck_modes(t, spot_hz, loaded_t60_ratio=0.95):
    """Free vibration: the hull's decaying modes after one blow, summed in four bands of peak 1."""
    hz, level_db, t60_s = np.transpose(HULL_MODES)[:, :, None]
    strength, detune, patch = rng.standard_normal((3, len(HULL_MODES), 1))
    rise = 1 - np.exp(-t * hz / 0.89)  # the wall takes about a cycle to get going
    skew = np.array([1, -1])[:, None, None] * hz / 2500 * patch  # each mode radiates from its own patch
    phase = 2 * np.pi * hz * (1 + 0.015 * detune) * t + np.minimum(hz / 400, 2) * detune
    band = np.digitize(hz[:, 0], [340, 850, 1700])  # edges in Hz
    # Of the lowest modes, those near the pitch of the struck spot take most.
    coupling_db = -14 * np.minimum(abs(np.log2(hz / spot_hz)), 1) * (band == 0)[:, None]
    start_db = level_db + coupling_db + np.minimum(hz / 200, 4.5) * strength
    modes = amp(start_db - 60 * t / (loaded_t60_ratio * t60_s)) * rise * np.sin(phase + skew)
    parts = [modes[:, band == k].sum(1) for k in range(4)]
    return [part / abs(part).max() for part in parts]


# Spectrum of a hard plastic contact: frequency_hz, level_db
SLAP_SPECTRUM = [(900, -22), (1800, -8), (3000, -7), (5000, -12), (8000, -12.5), (16000, -54)]
# Blows on the hull: start_s, level_db, knock_db, clack_db, slap_db, spot_hz, pan_db, hold_s
# (knock_db, clack_db and slap_db are relative to level_db)
KNOCKS = [(1.496, -54.5, -0.5, -6, -3.5, 272, -2.5, 0.11), (2.236, -55, 16, 15, 18.5, 283, 2, 0.09),
          (2.321, -47.5, -11, -4.5, 3, 230, -3, .05), (2.33, -13, -8, -11, -16, 233, 2, 0.072),
          (2.395, -32, -7, -17, -24, 300, 6, 0.039), (2.408, -14.5, -24, -33.5, -25.5, 176, 1.5, 0.1),
          (2.421, -23, -6.5, -9.5, -10, 227, 3, 0.05), (2.43, -16.5, -7, -13, -22, 223, 2, 0.094),
          (2.464, -30.5, -31.5, -39, -37, 232, -2, 0.053), (2.518, -32, -10, -13, -21, 103, 1.5, 0.11),
          (2.614, -30, -17, -16, -19.5, 125, 0.5, 0.18), (2.627, -28.5, -33, -26, -17, 235, 3, 0.058),
          (2.922, -34, -23.5, -23.5, -20.5, 161, 0.5, 0.19),
          (3.435, -46.5, -4.5, -9.5, -4.5, 301, 0.5, 0.18), (3.694, -44, -10, -16.5, -11, 210, 0.5, 0.077),
          (3.883, -37, -28, -14.5, -19, 237, 1, 0.15), (4.611, -31.5, 1, -6.5, -0.5, 201, 2, 0.1),
          (4.734, -39.5, -15, -37, -29, 208, 2.5, 0.023), (4.92, -48, 2.5, -6, 4, 134, -0.5, 0.082),
          (4.972, -36.5, -7.5, -18, 2.5, 210, 1.5, 0.089), (5.224, -46.5, 5, -1.5, -5, 215, -2.5, 0.1),
          (5.26, -39, 9.5, -8, -27, 306, 2, 0.062), (5.272, -40, 11.5, -12, -26, 306, 0, 0.018),
          (5.325, -36, 1, -2.5, -25, 266, 2, 0.057), (5.379, -25.5, -5.5, -14.5, -16.5, 176, 0, 0.021),
          (5.408, -39, -2, -3.5, -6.5, 226, 2.5, 0.013), (5.475, -44, -17, -0.5, -11, 183, -1.5, 0.1),
          (5.619, -37, -0.5, -7, -10.5, 170, 1, 0.12), (5.644, -36.5, 9, -0.5, -6.5, 300, -2.5, .05),
          (5.652, -30.5, 7.5, -3, -5, 300, -2, 0.052), (5.657, -20.5, 1, -3.5, -11, 202, 2, 0.098),
          (5.675, -28.5, 5.5, -9.5, -7.5, 302, 1.5, 0.042),
          (5.956, -30.5, -19.5, -12.5, -19, 208, -0.5, 0.083), (6.046, -30, 0, -14, -14, 132, 1, 0.063),
          (6.133, -24.5, -16.5, -29, -19, 139, 1.5, 0.056), (6.266, -38.5, 1.5, -14, -30, 206, 2, 0.058),
          (6.273, -22.5, -14, -20, -27, 198, 0, 0.063), (6.318, -28.5, -5, -12.5, -10, 207, 1, 0.023),
          (6.364, -42.5, 2, -11.5, -10, 149, 5, 0.15), (6.752, -65.5, 10, 4, 6.5, 139, 0, .05),
          (6.759, -57.5, 6, 6, 11.5, 139, -1.5, 0.1), (6.863, -32.5, -11, -26, -35, 186, 1, 0.09),
          (6.917, -32, -11, -17.5, -38, 200, 2, 0.045), (6.965, -40.5, 0.5, -8, -33.5, 155, 2, 0.096),
          (7.12, -53.5, -7, -1.5, -10, 140, -3, 0.09), (7.46, -55, -8, -12, -7, 163, 0.5, 0.09),
          (7.527, -54, -8, -11.5, -4, 145, -5, 0.098), (7.591, -51.5, 2.5, 0, -3, 272, 0, 0.063),
          (7.775, -45.5, -33, -20, -15, 159, -2.0, 0.17)]
def hull_knocks():
    """Impact and damping: each blow slaps and rings the hull until what leans on the wall stills it."""
    track, t = np.zeros((2, N)), np.arange(SR // 5) / SR
    end_fade = np.minimum(50 * (t[-1] - t), 1)
    for start_s, level_db, knock_db, clack_db, slap_db, spot_hz, pan_db, hold_s in KNOCKS:
        boom, knock, clack, ring = struck_modes(t, spot_hz)
        body = amp(1) * boom + amp(knock_db + 4.5) * knock + amp(clack_db + 6.5) * clack
        slap = burst(SLAP_SPECTRUM, t, t60_s=0.032, apart=1)
        slap += 0.1 * burst(SLAP_SPECTRUM, t, t60_s=0.23, apart=0.43)
        crack = burst(CRACK_SPECTRUM, t, t60_s=0.016, apart=0.14)
        crack += 0.08 * burst(CRACK_SPECTRUM, t, t60_s=0.041, apart=2.9)
        contact = amp(slap_db) * (ring + amp(5.5) * slap + amp(-0.5) * crack)
        damped_s = np.maximum(t - hold_s, 0)
        damping = amp(-11 * np.minimum(damped_s / 0.0079, 1) - 40 * damped_s)
        add(track, start_s, amp(level_db) * (body + contact) * damping * end_fade, pan_db)
    return track


def scene():
    """Superposition of every source on and around the boat."""
    return (hull_knocks() + hull_drag() + runoff() + spray_flicks() + ticks() + squeak() + rasps()
            + plops() + bird() + breeze())


# Phase by which the left port leads the right: frequency_hz, lead_rad
PORT_PHASE = [(0, -1.5), (690, 0.54), (950, -1.7), (1290, 0.5), (1980, -1.4), (2240, 1.05), (2760, -2.8),
              (3010, 0.74), (4480, -0.24), (6800, 3), (8010, 1.5), (8700, 0.7), (10900, 1.5), (16300, -2.5)]
def record(dry, bass_hz=55, top_hz=15850):
    """Phase difference and band limiting: the ports hear out of step and lose deep bass and top treble."""
    def response(hz):
        phase_shift = np.exp(0.5j * np.array([[1], [-1]]) * along(PORT_PHASE, hz))
        high_pass = (1j * hz / (bass_hz + 1j * hz)) ** 2
        return phase_shift * high_pass * (hz < top_hz)
    return filtered(dry, response)


dry = scene()
out = record(dry)
unload_audio(out)
```